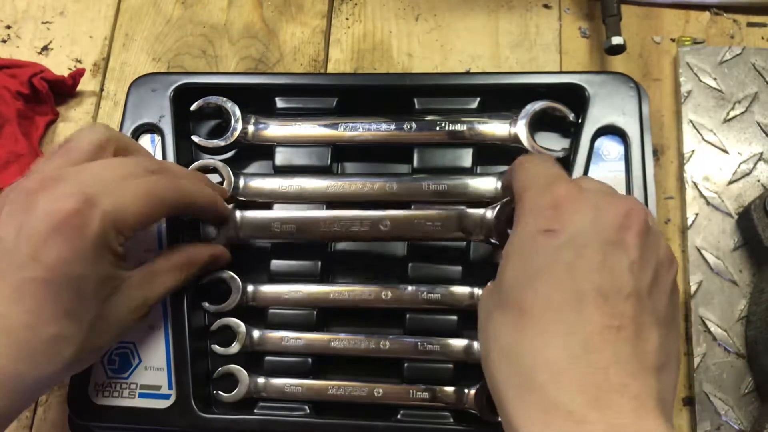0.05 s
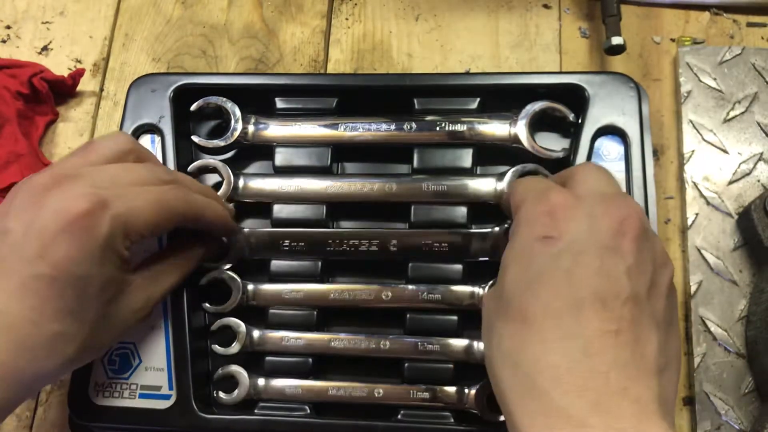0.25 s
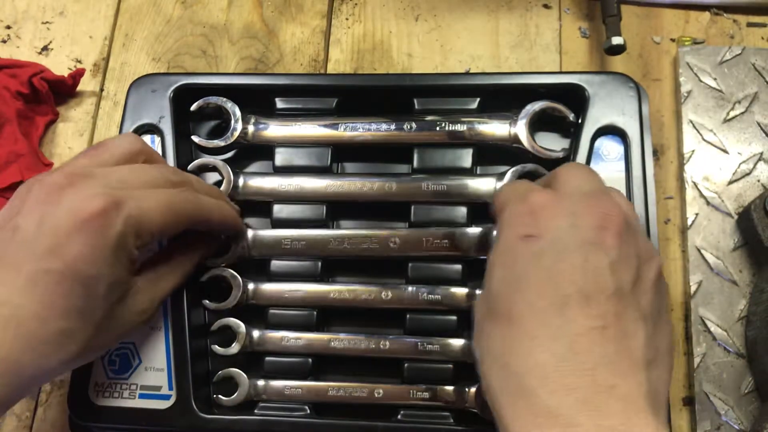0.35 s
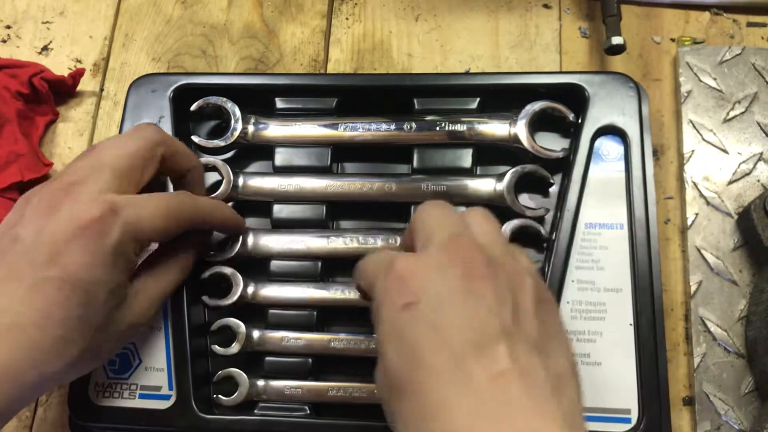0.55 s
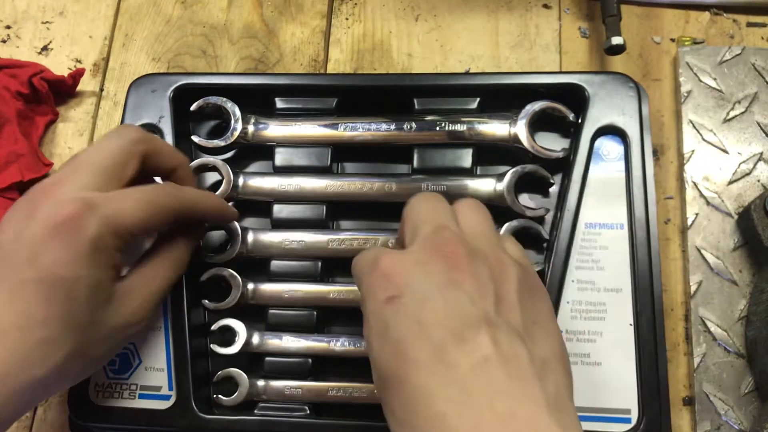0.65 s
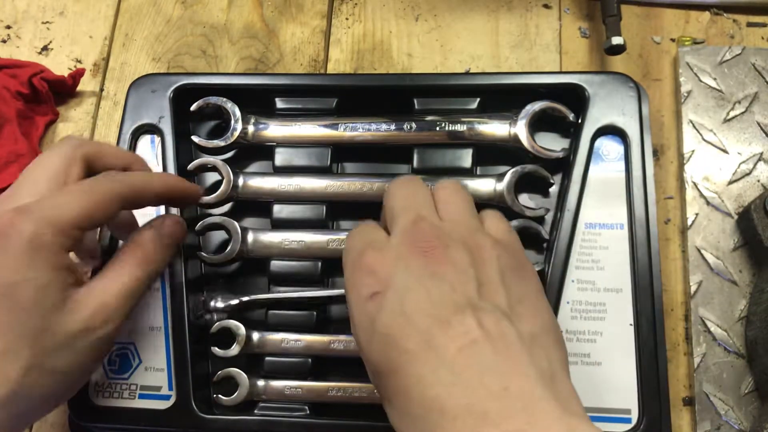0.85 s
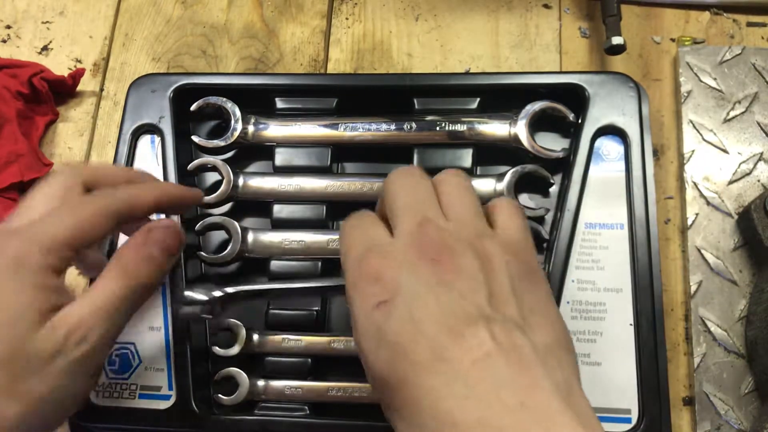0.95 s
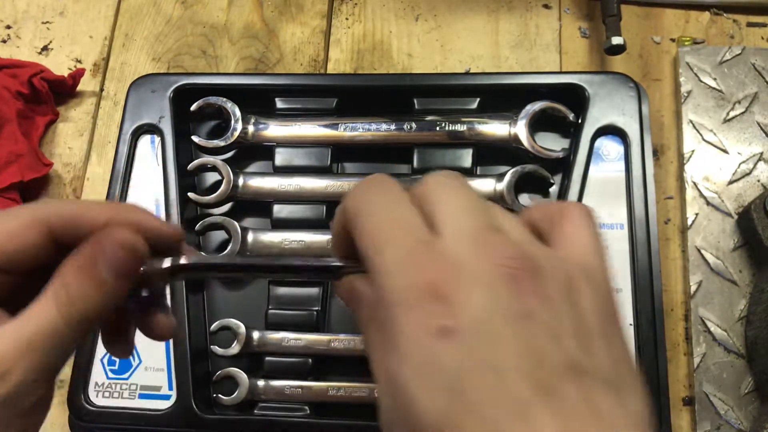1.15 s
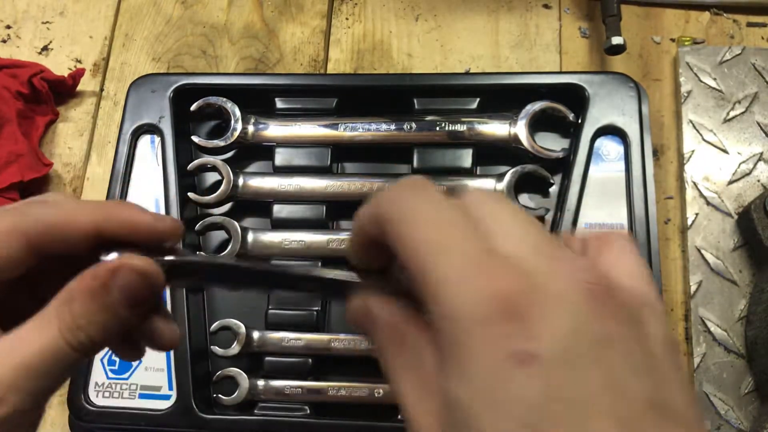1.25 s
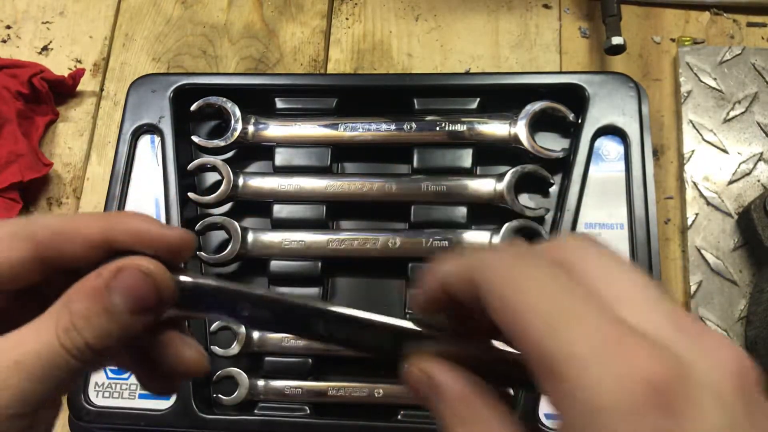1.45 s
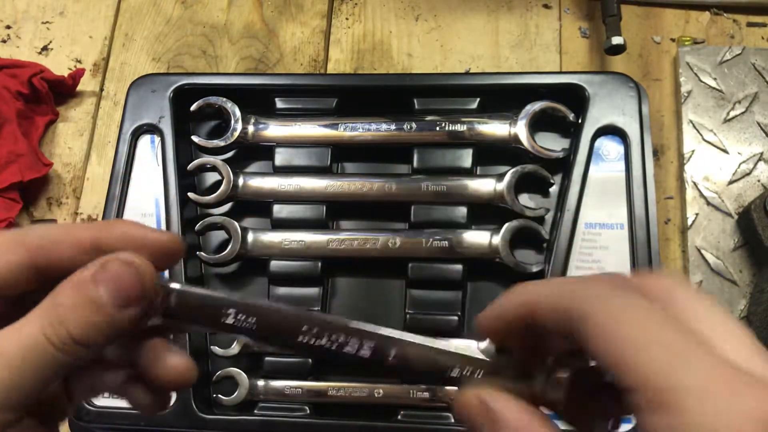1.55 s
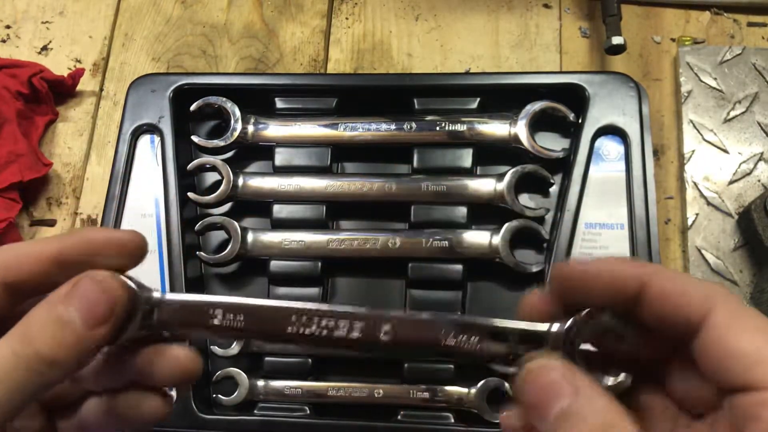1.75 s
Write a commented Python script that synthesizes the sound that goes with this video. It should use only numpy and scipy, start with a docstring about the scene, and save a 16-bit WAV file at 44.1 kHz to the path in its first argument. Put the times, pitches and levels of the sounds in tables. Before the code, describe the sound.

Steel wrenches clatter in a hollow plastic tray, close by. From about 0.15 to 0.4 seconds one is set down with loud, quick knocks and two bright, briefly ringing clinks. Softer knocks follow from 0.5 to 0.8 seconds. Around 0.9 to 1 second, a sharper knock and a light clink sound as another is lifted out. Then only faint handling ticks remain over a low workshop hum.

```python
"""A small workshop: steel wrenches are set into a plastic tray on a wooden bench; one is lifted out.
Each contact knocks the hollow tray, exciting its floor, its walls and the bench top.
Steel meets steel in three clusters of clinks; in each, one wrench rings briefly.
Hands add faint ticks and rubs. The room answers; air, a low machine hum and a thin whine lie behind."""
import sys
import numpy as np
from scipy import signal
from scipy.fft import rfft, irfft
from scipy.io import wavfile

SR = 44100
rng = np.random.default_rng(int(sys.argv[2]) if len(sys.argv) > 2 else 0)


def output_pcm(signal):
    """Save a mono or channel-first signal as 16-bit PCM at the path in sys.argv[1].

    Samples are clipped to [-1, 1] before scaling.
    """
    pcm = np.clip(np.atleast_2d(signal).T, -1, 1) * 32767
    wavfile.write(sys.argv[1], SR, np.round(pcm).astype(np.int16))


N = 79380
T = np.arange(N) / SR
HZ = np.maximum(np.fft.rfftfreq(N, 1 / SR), 1)

# room air spectrum: freq_hz, relative_density_db
AIR_SPECTRUM = [(15, -33), (27, -17), (37, 7.5), (90, 1.5), (140, -10), (300, -6.5), (600, -15.5),
                (1600, -12.5), (2200, -28.5), (3200, -23.5), (4200, -37.5), (6000, -40.5), (10000, -47),
                (15500, -39)]
# machine hum: pitch_hz, level_db
HUM_TONES = [(53, -48), (76, -47.5)]
# handling ticks: start_s, level_db
HAND_TICKS = [(0.1229, -48), (.17, -46), (0.851, -56), (1.052, -53), (1.127, -55), (1.328, -55),
              (1.628, -55)]
# skin and steel sliding on the tray: start_s, length_s, level_db, cutoff_hz
HAND_RUBS = [(0, .1, -50.5, 900), (0.488, 0.24, -65.5, 11800)]
# knocks on the tray: start_s, level_db, cutoff_hz, floor_db, wall_db, bench_db
TRAY_KNOCKS = [(0.153, -24, 2570, -14, -6, 0), (.169, -31.5, 3840, 2.5, -4, 7),
               (0.2163, -13, 5350, 8.5, -6, -3), (.226, -18.5, 4400, 9.5, -5, 8.5),
               (.262, -10.5, 1480, -19, 8.5, -10), (0.263, -13, 4200, -1.5, 1.5, -15),
               (.281, -17.5, 3250, 6.5, -22, -4), (0.2908, -17, 2940, -8, 1, -3.5),
               (.311, -13, 2920, -5, 2, -9.5), (.334, -23.5, 3040, 4.5, -30, 3),
               (0.346, -27.5, 3500, -20, -14, 6), (0.3749, -46, 2440, 2, 3.5, 12),
               (0.4996, -29, 2160, 3.5, -0.5, -2), (.510, -29, 3600, 2.5, -5.5, 11),
               (.526, -33.5, 2500, 5, 2.5, 8.5), (.639, -41.5, 2000, 0, -6, -1),
               (0.661, -37, 4020, -5, -14, 11), (.691, -31.5, 2830, -6, 1, 8.5),
               (.728, -22, 2920, -19, 0, -3), (0.743, -29.5, 2050, -0.5, 3, -8),
               (.761, -33, 2420, -8, 1.5, 14), (0.8032, -37, 2380, 1, -16, 16.5),
               (0.9021, -16.5, 3800, -3.5, 0.5, -22.5), (0.93, -28, 3480, -5, -10, 1.5),
               (.958, -27, 3600, -21, -3, 2), (.968, -26, 2760, -16, 0, -1), (0.993, -30, 3540, 1, -4, 0),
               (.999, -27.5, 2640, -3, -19, -1), (1.011, -34.5, 2380, 7, -15, 7.5)]
# dense resonances of plastic and of steel contact: freq_hz, relative_density_db, t60_s
PLASTIC_CLATTER = [(80, -9, 0.25), (200, -4.5, 0.2), (380, 0, 0.056), (546, -3, 0.07), (1050, 3, 0.053),
                   (1730, 0, 0.072), (2170, -10.5, 0.047), (3054, -1, 0.036), (4760, -16, 0.028),
                   (6120, -8.5, 0.034), (7500, -23.5, .035), (16000, -20, .03)]
STEEL_CRACK = [(1500, 6, 0.06), (3000, 5.5, 0.069), (5200, 2, 0.073), (6600, -13.5, .09),
               (8500, -17.5, .07), (10500, -17, 0.078), (12500, -15, .07), (16000, -25, .06)]
# modes of hollow tray floor, stiff tray walls, bench top: pitch_hz, level_db, t60_s
TRAY_FLOOR_MODES = [(282.7, -11, 0.119), (355, -10.5, 0.12), (379.4, -4, .08), (432.2, -12.5, 0.079)]
TRAY_WALL_MODES = [(702, -14, 0.05), (831, -4, 0.037), (960, -9, .045), (1077, -6, 0.053),
                   (1214, -11.5, 0.064), (1494, -4, 0.058), (1549.3, 2, 0.05), (1676, -7.5, 0.082),
                   (1747, -10, .04)]
BENCH_TOP_MODES = [(106.1, -20, 0.32), (158.7, -18, 0.108), (201.3, -8, 0.18), (225.3, -12, 0.25)]
# modes of the wrench set down, its seated neighbour, the smaller one lifted: pitch_hz, level_db, t60_s
HELD_MODES = [(2466, -26, .08), (2998, -20, .11), (4366, -21, .12), (4580, -25, .06), (5033, -22, .08),
              (7177, -32, .29), (7775, -30, .11), (8145, -28, .08), (8500, -34, .08), (9275, -44, .16),
              (9943, -40, .14), (11940, -34, .09), (12740, -30, .08), (13820, -36, .08), (14480, -41, .14),
              (15320, -40, .1), (15750, -36, .07)]
SEATED_MODES = [(1899, -18, .15), (1945, -26, .1), (3036, -31, .22), (3081, -41, .55), (3790, -37, .15),
                (4690, -44, .2), (5340, -32, .11), (5496, -32, .11), (5600, -29, .1), (7780, -37, .15),
                (8880, -47, .12), (9641, -37, .31), (10920, -40, .13), (12260, -53, 1.1), (13088, -39, .56)]
LIFTED_MODES = [(2250, -46, .2), (3399, -51, .6), (4550, -42, .46), (5415, -52, .4), (5810, -37, .12),
                (5940, -44, .1), (7612, -55, .2), (9200, -62, .1), (10520, -66, .3), (11680, -60, .35),
                (12270, -60, .2)]
# steel on steel, per wrench: start_s, ring_db, cutoff_hz, crack_db
HELD_CONTACTS = [(0.2168, -4, 19000, -18.5), (.223, -14.5, 7000, -26)]
SEATED_CONTACTS = [(0.3073, -3, 18000, -23), (0.3121, -8.5, 6000, -24), (0.333, -14, 6000, -30.5),
                   (.348, -14.5, 5500, -30)]
LIFTED_CONTACTS = [(0.9579, -2.5, 13900, -54), (0.968, -10.5, 9000, -52), (.991, -22, 5000, -51),
                   (1.018, -0.5, 3050, -60)]


def from_db(db):
    """Decibels to gain."""
    return 10 ** (np.asarray(db) / 20)


def unit_rms(x):
    """Scale to rms 1."""
    return x / np.sqrt(np.mean(x ** 2) + 1e-20)


def at_hz(table, hz, column=1):
    """Interpolate a column over log frequency."""
    table = np.array(table)
    return np.interp(np.log(hz), np.log(table[:, 0]), table[:, column])


def lowpass(x, hz, order=2):
    """Causal Butterworth low-pass."""
    return signal.sosfilt(signal.butter(order, min(hz, .45 * SR), fs=SR, output="sos"), x)


def add(out, start_s, sound):
    """Mix a sound in at start_s."""
    i = int(start_s * SR)
    out[i:i + len(sound)] += sound[:N - i]


def shaped_noise(gain):
    """Steady noise with a gain per frequency; rms 1."""
    return unit_rms(irfft(rfft(rng.standard_normal(N)) * gain, N))


def wander(t, rate_hz, points):
    """Random values joined by straight lines."""
    return np.interp(t * rate_hz, np.arange(points), rng.standard_normal(size=points))


def struck_modes(modes, t):
    """Decaying sines of alternating sign."""
    return sum((-1) ** k * from_db(db - 60 * t / t60_s) * np.sin(2 * np.pi * hz * t)
               for k, (hz, db, t60_s) in enumerate(modes))


def dense_modes(table, band_count=26, size=8192):
    """Many close resonances struck at once: noise bands, each with its own decay; energy about 1."""
    t, hz = T[:size], np.fft.rfftfreq(size, 1 / SR)
    edges_hz = np.geomspace(60, 17000, band_count + 1)[:, None]
    centre_hz = np.sqrt(edges_hz[1:] * edges_hz[:-1])
    in_band = (hz >= edges_hz[:-1]) & (hz < edges_hz[1:])
    decay = from_db(-60 * t / at_hz(table, centre_hz, column=2))
    bands = irfft(rfft(rng.standard_normal(size)) * in_band) * decay
    band_norm = np.sqrt((decay ** 2).sum(1) / (bands ** 2).sum(1))
    gain = (from_db(at_hz(table, centre_hz)) * np.sqrt(centre_hz))[:, 0]
    return (gain * band_norm) @ bands / np.linalg.norm(gain)


def background(air_db=-49.5, waver_rad=.79, whine_db=-80.5, whine_hz=13460, half_width_hz=80):
    """Room air, machine hum with wandering phase, narrow-band whine."""
    drift_rad = waver_rad * wander(T, rate_hz=7, points=64)
    hum = sum(from_db(db) * unit_rms(np.sin(2 * np.pi * hz * T + (-1) ** k * drift_rad))
              for k, (hz, db) in enumerate(HUM_TONES))
    whine = from_db(whine_db) * shaped_noise(1 / (1 + ((HZ - whine_hz) / half_width_hz) ** 2))
    air = from_db(air_db) * shaped_noise(from_db(at_hz(AIR_SPECTRUM, HZ)))
    return hum + whine + air


def room_reverb(x, level_db=-13.5, t60_s=.17, delay_s=.006, cutoff_hz=6100):
    """Workshop reflections: a short, dull noise tail."""
    envelope = from_db(-60 * T / t60_s) * (T > delay_s)
    tail = lowpass(rng.standard_normal(N) * envelope, cutoff_hz, order=1)
    return from_db(level_db) * signal.fftconvolve(x, tail / np.linalg.norm(tail))[:N]


def handling(tick_t60_s=.0095, tick_cutoff_hz=6500, rub_fade_s=.0114):
    """Hands at work: tiny ticks and soft sliding friction."""
    out, t = np.zeros(N), T[:2048]
    for start_s, db in HAND_TICKS:
        tick = lowpass(rng.standard_normal(len(t)), tick_cutoff_hz, order=1)
        add(out, start_s, from_db(db - 60 * t / tick_t60_s) * tick)
    for start_s, length_s, db, cutoff_hz in HAND_RUBS:
        stroke = np.clip(np.minimum(T - start_s, start_s + length_s - T) / rub_fade_s, 0, 1)
        out += from_db(db) * stroke * unit_rms(lowpass(rng.standard_normal(N), cutoff_hz))
    return out


def tray_knocks(clatter_db=3, spread_s=.00081):
    """Each knock excites plastic clatter, floor, walls and bench; soft contacts are duller."""
    out, t = np.zeros(N), T[:8192]
    floor = struck_modes(TRAY_FLOOR_MODES, t)
    walls = struck_modes(TRAY_WALL_MODES, t)
    bench = struck_modes(BENCH_TOP_MODES, t)
    attack = 1 - np.exp(-t / spread_s)  # the blow spreads over the tray
    for start_s, db, cutoff_hz, floor_db, wall_db, bench_db in TRAY_KNOCKS:
        clatter = from_db(clatter_db) * dense_modes(PLASTIC_CLATTER)
        body = clatter + from_db(floor_db) * floor + from_db(wall_db) * walls + from_db(bench_db) * bench
        add(out, start_s, from_db(db) * lowpass(body * attack, cutoff_hz, order=3))
    return out


def wrench(modes, contacts, damp_from_s, damping_db_per_s=256, settle_s=.045):
    """Each contact cracks and tops up the bar's chattering ring; glancing ones feed only low modes."""
    starts_s, ring_db, cutoffs_hz, _ = np.transpose(contacts)
    out, t = np.zeros(N), T[:SR * 3 // 5]
    scene_s = starts_s[0] + t
    hit_samples = ((starts_s - starts_s[0]) * SR).astype(int)
    chatter_depth = np.exp(-np.maximum(scene_s - starts_s[-1], 0) / settle_s)
    ring = np.zeros(len(t))
    for hz, mode_db, t60_s in modes:
        kicks = np.zeros(len(t))
        kicks[hit_samples] = from_db(ring_db + mode_db) / np.sqrt(1 + (hz / cutoffs_hz) ** 8)
        pole = from_db(-60 / (t60_s * SR))
        envelope = signal.lfilter([1], [1, -pole], kicks + 1e-18)
        chatter = 1 + chatter_depth * wander(t, rate_hz=152.6, points=256)
        ring += envelope * chatter * np.sin(2 * np.pi * hz * t)
    damping = from_db(-damping_db_per_s * np.maximum(scene_s - damp_from_s, 0))
    add(out, starts_s[0], ring * damping)
    for start_s, _, cutoff_hz, crack_db in contacts:
        add(out, start_s, from_db(crack_db) * lowpass(dense_modes(STEEL_CRACK), cutoff_hz))
    return out


def scene():
    """Wrenches, tray and hands close by, plus reverb and background; mono."""
    steel = (wrench(HELD_MODES, HELD_CONTACTS, damp_from_s=.305)
             + wrench(SEATED_MODES, SEATED_CONTACTS, damp_from_s=.78)
             + wrench(LIFTED_MODES, LIFTED_CONTACTS, damp_from_s=1.19))
    near = tray_knocks() + steel + handling()
    return (near + room_reverb(near) + background())[None]


def record(dry):
    """Soft peak limit, then a steep low-pass."""
    ceiling, cutoff_hz = .97, 15900
    rounded = dry / (1 + (dry / ceiling) ** 4) ** .25
    return signal.sosfilt(signal.ellip(10, .2, 80, cutoff_hz, fs=SR, output="sos"), rounded)


dry = scene()
out = record(dry)
output_pcm(out)
```